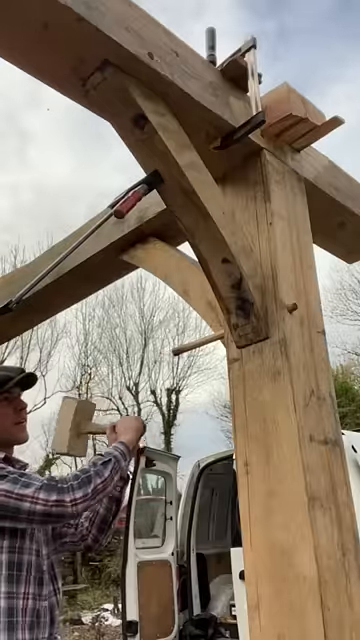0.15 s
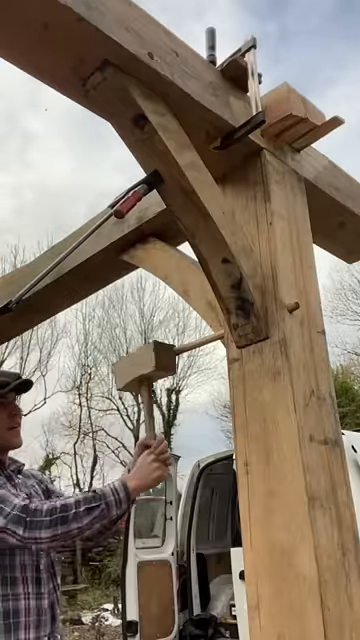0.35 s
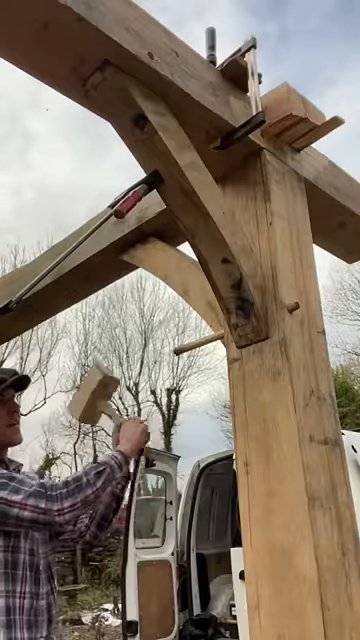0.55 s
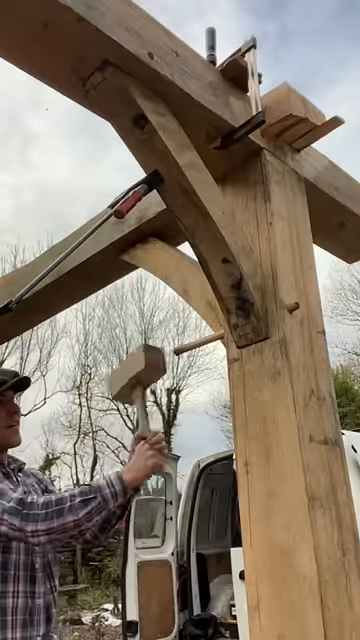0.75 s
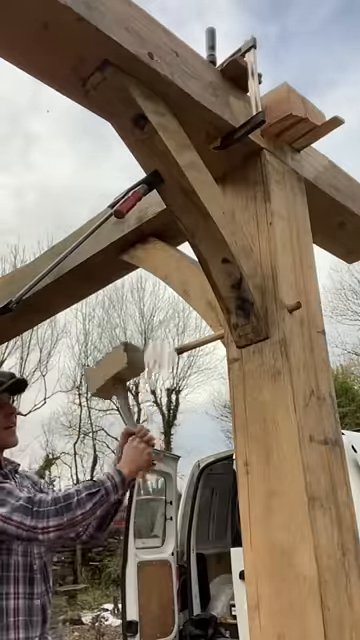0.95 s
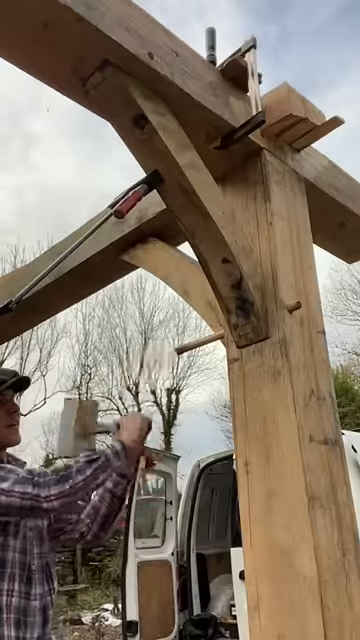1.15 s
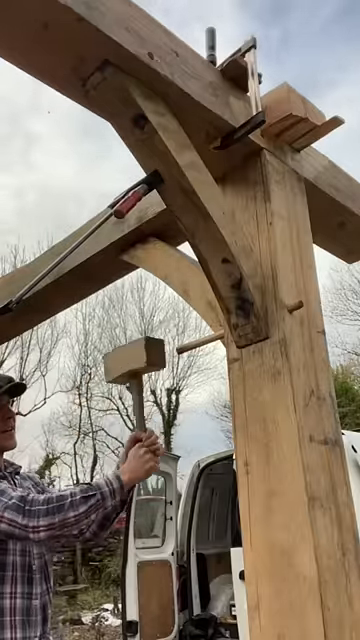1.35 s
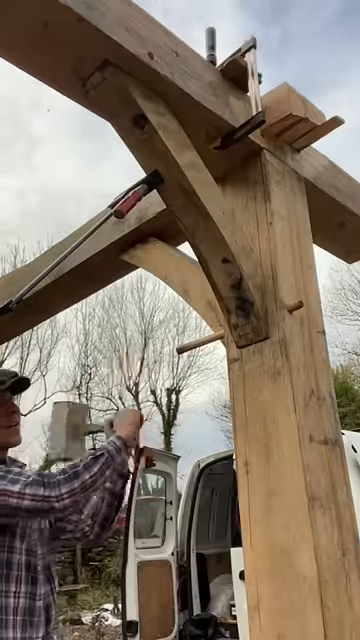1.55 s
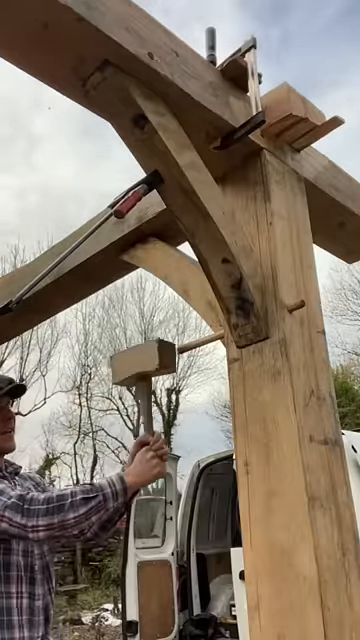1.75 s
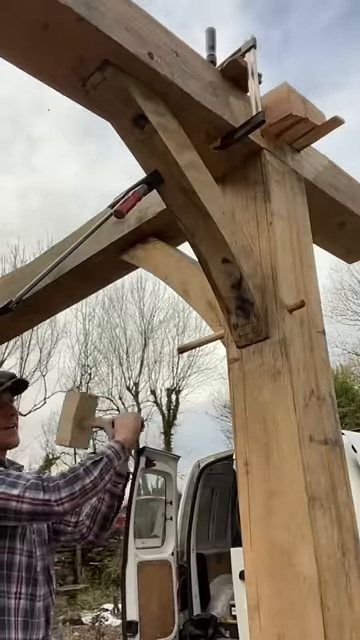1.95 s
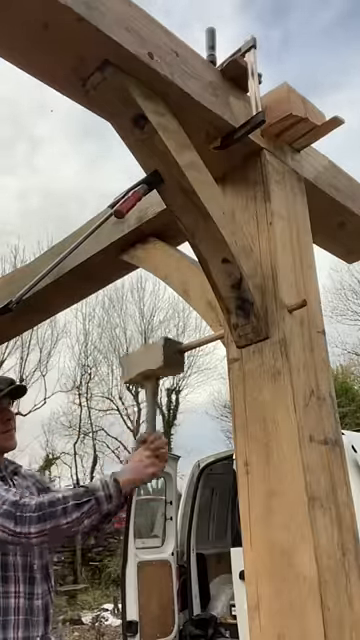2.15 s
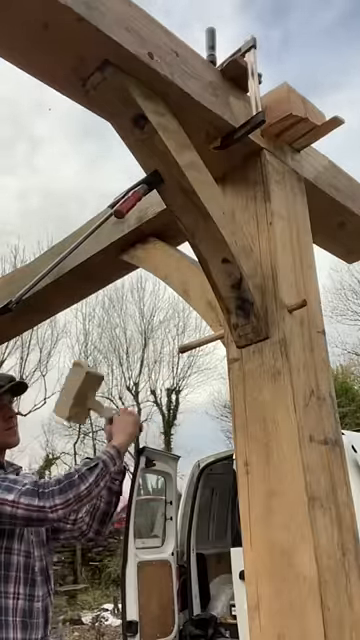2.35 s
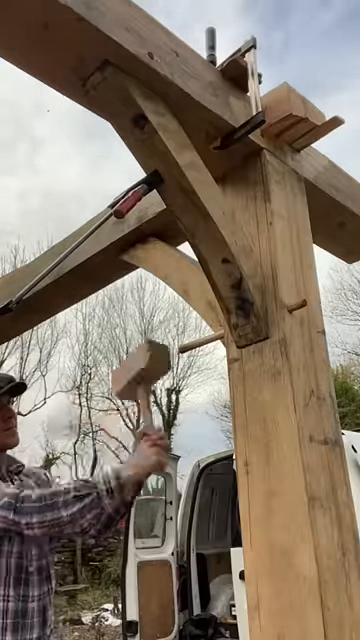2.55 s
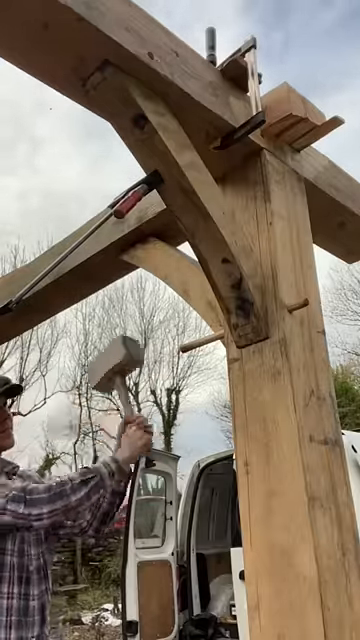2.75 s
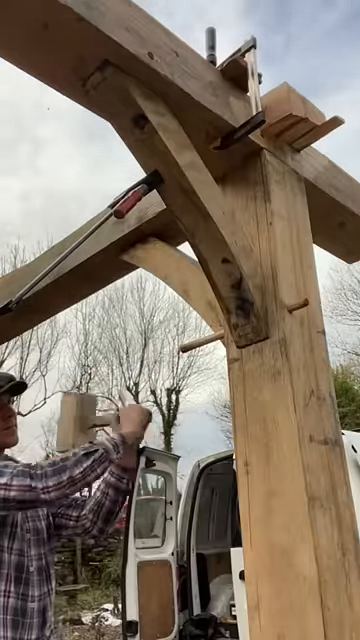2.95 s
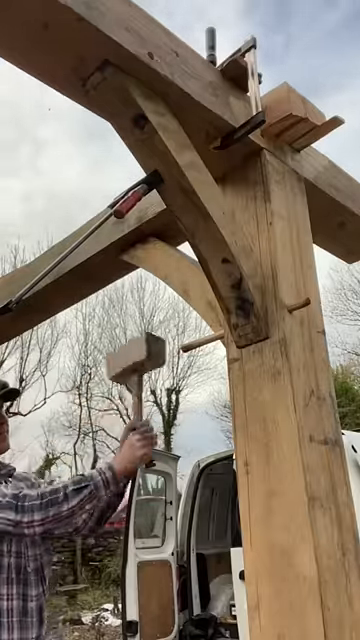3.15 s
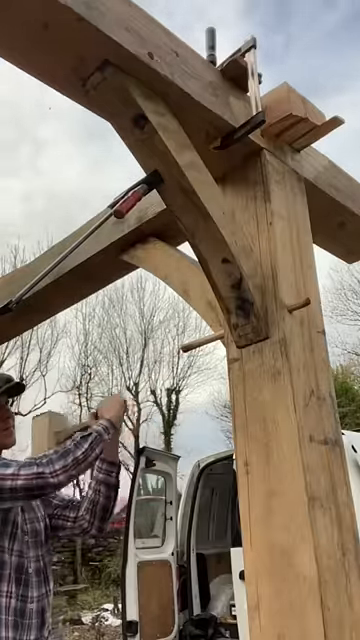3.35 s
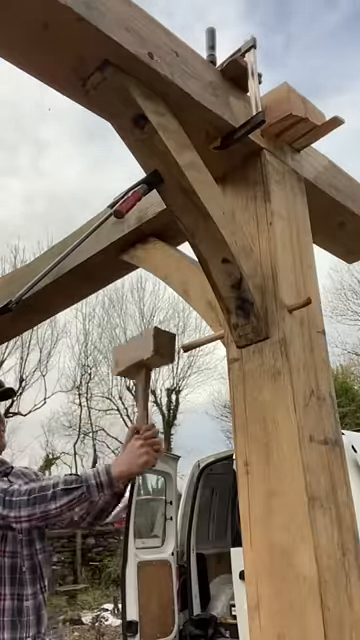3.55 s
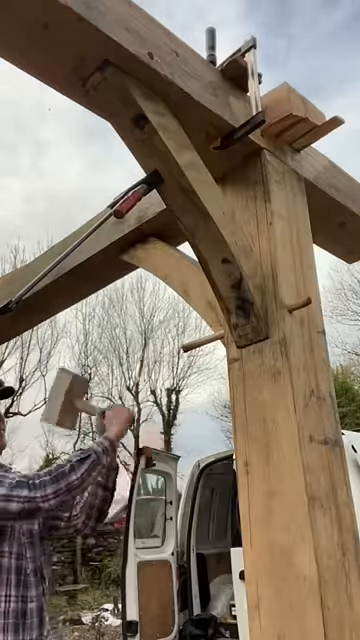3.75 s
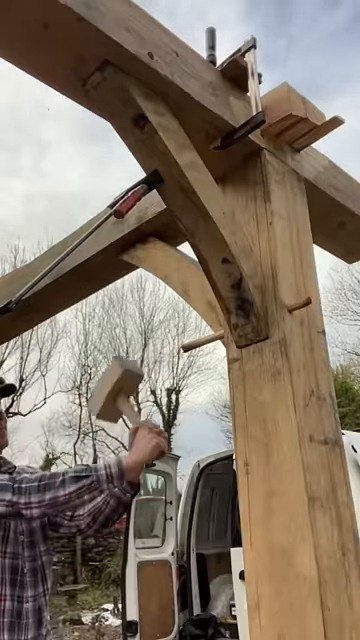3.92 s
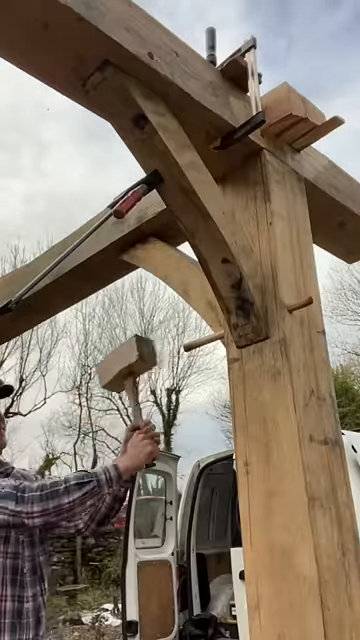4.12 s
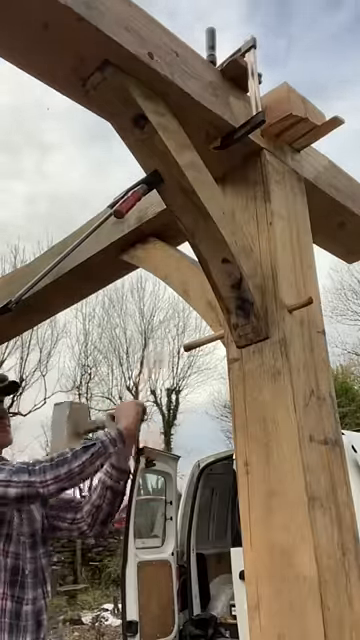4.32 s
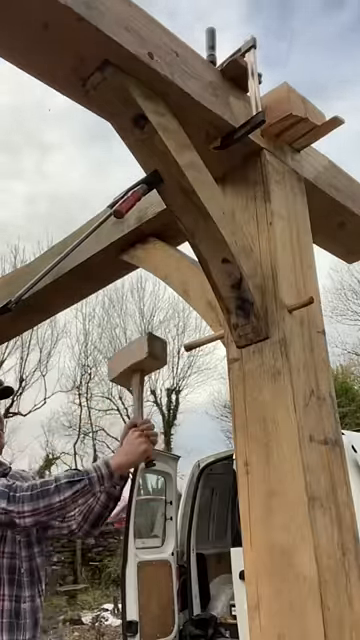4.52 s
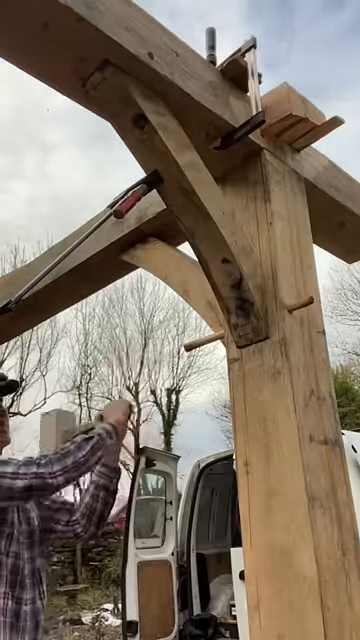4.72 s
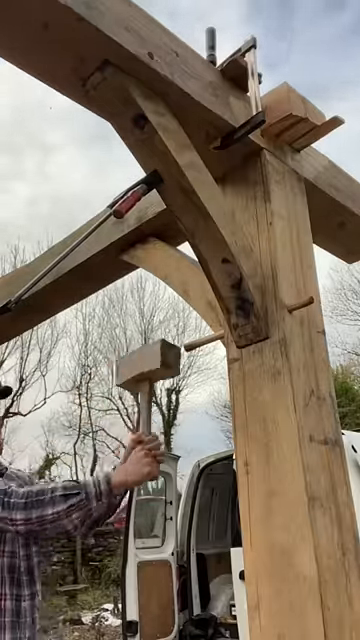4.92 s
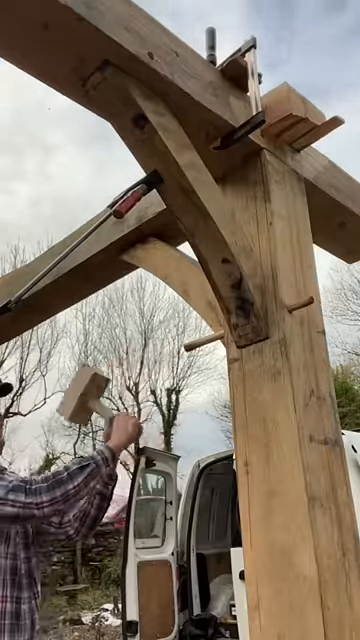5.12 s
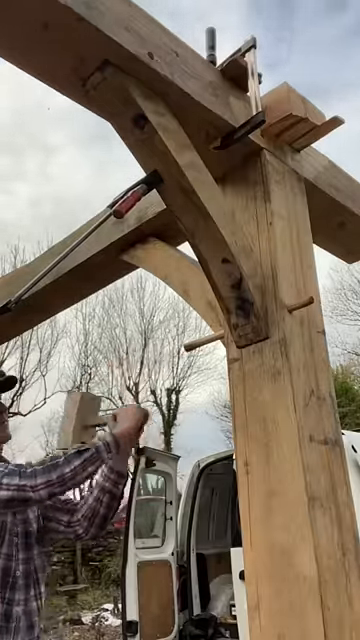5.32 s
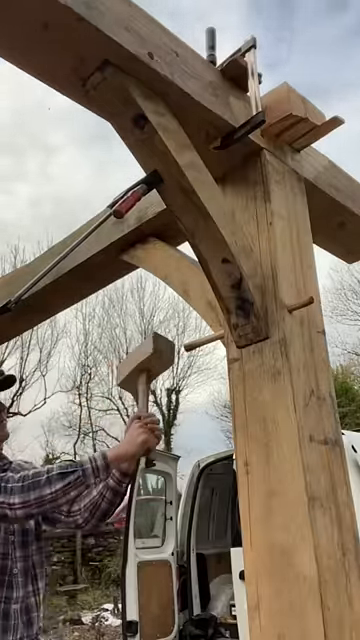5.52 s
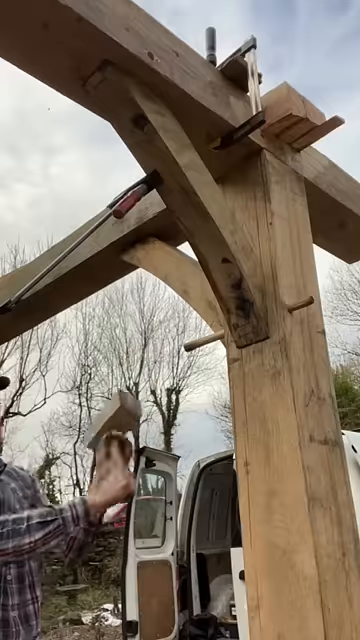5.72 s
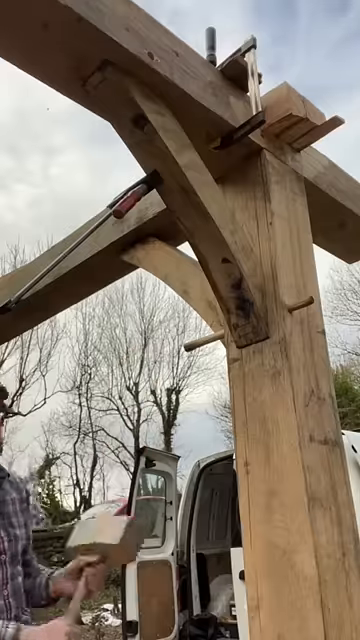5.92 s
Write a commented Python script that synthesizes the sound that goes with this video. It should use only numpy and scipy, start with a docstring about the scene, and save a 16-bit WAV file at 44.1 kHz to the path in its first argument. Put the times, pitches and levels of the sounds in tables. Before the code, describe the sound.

A big wooden mallet drives an oak peg into a timber frame in a quiet yard. Twelve blows land at about two per second, each a sharp woody crack with a thump and a short, clattering echo. A faint low ring rises in pitch as the peg goes in. The last two blows sound deeper and hollow, with a very faint distant bird between them. A sleeve rustles softly at the end.

```python
"""Outdoors, a big wooden mallet drives an oak peg into the joint of a timber frame.
The tail of one blow opens; twelve more follow from 0.4 s, each a short woody crack, then a thump, a
pitched clatter of echoes and the yard's tail. A faint low ring climbs in pitch as the peg goes in.
The last two blows (5.0 s, 5.5 s) land on a tight joint, deep and hollow; between them a far bird
chirps. Last, a sleeve rustles as the arm comes down."""
import sys
import numpy as np
from scipy import signal
from scipy.fft import rfft, irfft, next_fast_len
from scipy.io import wavfile
from scipy.ndimage import uniform_filter1d

SR = 44100
rng = np.random.default_rng(int(sys.argv[2]) if len(sys.argv) > 2 else 0)


def store_wav(level_fs):
    """Save 16-bit WAV to argv[1]."""
    pcm = np.round(np.clip(np.atleast_2d(level_fs), -1, 1) * 32767)
    wavfile.write(sys.argv[1], SR, pcm.T.astype(np.int16))


N = 268118
BLOW_N = SR * 2 // 3  # samples per blow
T = np.arange(BLOW_N) / SR

# Near-echo spectrum: (frequency [Hz], density [dB])
NEAR_SPECTRUM = [(25, -18), (60, -8), (120, -8.5), (160, -12.5), (220, -2.5), (330, -1), (400, -4),
                 (480, -6.5), (750, -1.5), (1200, -9), (1550, 7), (2000, 1), (3000, -7.5), (4300, -10.5),
                 (9000, -14.5), (12000, -27), (15500, -26)]


def amp(db):
    """Decibels to gain."""
    return 10 ** (np.asarray(db) / 20)


def unit(x):
    """x at rms 1."""
    return x / np.sqrt(np.mean(x ** 2) + 1e-20)


def along(points, hz):
    """(frequency [Hz], value) points read on a log axis."""
    point_hz, values = np.transpose(points)
    return np.interp(np.log(hz + 1), np.log(point_hz + 1), values)


def fade(t60_s, t=T):
    """Decay of 60 dB in t60_s."""
    return np.exp(-np.log(1000) * t / t60_s)


def rise(start_s, rise_s):
    """Smooth step from 0 to 1."""
    return 1 - np.exp(-(np.maximum(T - start_s, 0) / rise_s) ** 2)


def swell(centre_s, spread_s, t=T):
    """Gaussian envelope, peak 1."""
    return np.exp(-0.5 * ((t - centre_s) / spread_s) ** 2)


def noise(spectrum, size=BLOW_N):
    """Coloured noise, rms 1."""
    gain = amp(along(spectrum, np.fft.rfftfreq(size, 1 / SR)))
    return unit(irfft(rfft(rng.standard_normal(size)) * gain, size))


def coloured(x, points):
    """Minimum-phase filter through (frequency [Hz], gain [dB]) points."""
    hz = np.fft.rfftfreq(2 * BLOW_N, 1 / SR)
    cepstrum = irfft(np.log(amp(along(points, hz))))
    cepstrum[1:BLOW_N] *= 2
    cepstrum[BLOW_N + 1:] = 0
    return irfft(rfft(x, 2 * BLOW_N) * np.exp(rfft(cepstrum)))[:BLOW_N]


def ring(partials, scatter_db, detune, waver=0, size=BLOW_N):
    """Damped sines; level and pitch vary per call, waver adds pitch jitter."""
    hz, db, t60_s = np.transpose(partials)[:, :, None]
    strength, pitch = rng.standard_normal((2, len(partials), 1))
    hold_n = 384
    steps = rng.standard_normal((len(partials), size // hold_n + 1))
    jitter = np.repeat(steps, hold_n, axis=1)[:, :size]
    phase = 2 * np.pi * np.cumsum(hz * (1 + detune * pitch + waver * jitter), axis=1) / SR
    waves = amp(db + scatter_db * strength) * fade(t60_s, T[:size]) * np.sin(phase)
    return np.pad(waves.sum(axis=0), (0, BLOW_N - size))


def add(track, x, start_s):
    """Mix x into track; start_s may be negative."""
    at = round(start_s * SR)
    lo, hi = max(at, 0), min(at + len(x), len(track))
    track[lo:hi] += x[lo - at:hi - at]


def strike():
    """Wood on wood: contact builds within 1 ms, fibres crack, head and peg ring briefly."""
    # Head and peg modes: (frequency [Hz], level [dB], t60 [s])
    wood_modes = [(569, -27, 0.028), (760, -22, 0.023), (942, -26.5, 0.035), (1665, -14.5, 0.02),
                  (1810, -22, 0.044), (2370, -34, 0.009), (2277, -9.5, 0.014), (2790, -27.5, 0.03),
                  (3350, -21, 0.017), (3760, -25, 0.018), (3950, -23.5, 0.018), (4290, -20, 0.017),
                  (4680, -26, 0.019), (5410, -18.5, 0.014), (5970, -17.5, 0.014), (7930, -24, 0.015),
                  (9380, -24, 0.013), (9370, -17, 0.011), (14800, -18.5, 0.0037)]
    # Fibre crack: (frequency [Hz], density [dB])
    crack_spectrum = [(200, -27), (1200, -9), (2500, 4), (6000, 5), (11000, -2.5), (16000, -2)]
    # The crack has little bass; the low thump arrives just after: (frequency [Hz], gain [dB])
    bass_cut = [(100, -11), (260, -8), (440, 0)]
    crack = amp(-11) * noise(crack_spectrum) * fade(0.008)
    wood = amp(1) * ring(wood_modes, scatter_db=1.8, detune=0.031, size=2048)
    return coloured((wood + crack) * rise(0, 0.0004), bass_cut)


def thump():
    """Slow bending waves run through the frame and arrive after the crack."""
    # Wave packets: (delay [s], spread [s], frequency [Hz], level [dB])
    packets = [(0.011, 0.0027, 309.4, -40.5), (0.02, 0.007, 65.76, -35), (.02, 0.0029, 217.4, -37),
               (.057, 0.0072, 215, -36), (0.102, 0.0057, 79.6, -44.5)]
    waves = np.zeros(BLOW_N)
    for delay_s, spread_s, hz, db in packets:
        envelope = amp(db + rng.normal(0, 0.5)) * swell(delay_s, spread_s)
        waves += envelope * np.cos(2 * np.pi * hz * (T - delay_s))
    return waves


def frame_and_clatter():
    """Low frame ring, plus a pitched 1.5-2.3 kHz clatter of nearby echoes."""
    # Low frame ring, then echo comb lines from 1470 Hz up: (frequency [Hz], level [dB], t60 [s])
    partials = [(52, -44.5, 0.38), (92.8, -48.5, 0.63), (122.1, -44, 0.4), (210, -45, 0.17),
                (312, -38, 0.073), (391.5, -38.5, 0.14), (542.3, -27.5, 0.13), (719, -43.5, 0.34),
                (766, -43.5, 0.26), (914, -37, .11), (1470, -31, 0.041), (1540, -25.5, 0.22),
                (1612, -26.5, 0.082), (1700, -27.5, 0.075), (1830, -29, 0.076), (1776, -29, 0.11),
                (1875, -24, 0.17), (1950, -29.5, 0.22), (2121, -30, 0.13), (2300, -31, 0.08)]
    return ring(partials, scatter_db=0.1, detune=0.0011, waver=0.006) * rise(0.0049, 0.011)


def near_echoes(surfaces):
    """The same nearby surfaces return every blow: strong clusters over dense scatter."""
    # Echoes off beams, ground and a van: (delay [s], spread [s], level [dB])
    echoes = [(0.015, 0.0015, -5.5), (0.0247, 0.00067, -6), (0.0291, 0.0022, -0.5), (0.052, 0.0033, -9)]
    cluster_power = sum(amp(db) ** 2 * swell(delay_s, spread_s) for delay_s, spread_s, db in echoes)
    scatter = amp(-0.5) * fade(0.25) * rise(0.003, 0.0063)
    pattern = unit(surfaces + amp(-13.5) * noise(NEAR_SPECTRUM))
    return amp(-25.5) * pattern * np.sqrt(cluster_power + scatter ** 2)


def yard():
    """Trees and walls farther off return a long tail, with one far wall's soft slap."""
    # Tail colour: (frequency [Hz], density [dB])
    spectrum = [(30, -18.5), (80, 1.5), (155, -1), (240, 3), (420, -6.5), (750, 4.5), (1200, -4.5),
                (1550, 3.5), (1950, 4.5), (2400, -3), (3000, -6.5), (4400, -7), (7500, -9.5), (10000, -21),
                (13000, -35), (16000, -35)]
    # Tail decay: (frequency [Hz], t60 [s])
    decay = [(100, .55), (500, 0.41), (1100, .46), (1850, 0.53), (2700, 0.51), (8000, 0.46), (12000, 0.56),
             (16000, .25)]
    hz, t, bins = signal.stft(noise(spectrum), SR, nperseg=256)
    bins *= fade(along(decay, hz)[:, None], t)
    tail = signal.istft(bins, SR, nperseg=256)[1][:BLOW_N]
    slap = amp(-9.5) * swell(0.15, 0.0127)
    return amp(-34) * tail * (rise(0.016, 0.061) + slap)


def aim_colour(blow, bite_db, bright_db, thump_db):
    """Where head meets peg sets the colour: edge-on contact bites, a square blow lifts the treble."""
    bite = [(2460, 0), (3550, bite_db), (4500, 0)]
    bass = [(30, thump_db - 3.5), (110, thump_db), (190, 0)]
    treble = [(2500, 0), (7000, bright_db)]
    return coloured(coloured(blow, bite), bass + treble)


def joint_colour(blow, peg_hz, tightness, band_weight):
    """A tighter joint sounds more hollow; the peg adds bands that follow its pitch."""
    # Fully tight joint relative to loose: (frequency [Hz], gain [dB])
    hollow = [(70, -4), (140, 4.5), (210, 2), (310, 20), (400, 20.5), (520, 20), (740, 9), (1150, 7.5),
              (1550, -6.5), (2200, -8.5), (3000, -3), (4600, -7), (7000, -9)]
    # Peg bands: (multiple of peg pitch [-], gain at weight 1 [dB])
    bands = [(6, -1), (8.4, 2.5), (10.2, -0.5), (11.2, -2), (12.4, 2), (13.6, 3.5), (15.5, -1), (18, -0.5),
             (24, -2)]
    blow = coloured(blow, [(hz, tightness * db) for hz, db in hollow])
    return coloured(blow, [(multiple * peg_hz, band_weight * db) for multiple, db in bands])


def peg_ring(peg_hz, tightness):
    """The peg's free end rings on, more briefly as the joint grips."""
    t60_s = np.interp(tightness, [0, 1], [0.65, 0.2])
    return np.sin(2 * np.pi * peg_hz * T) * fade(t60_s) * rise(0.01, 0.02)


def mallet():
    """Each blow cracks, thumps, echoes and leaves the peg ringing."""
    # Blows: (time [s], level [dB], bite [dB], brightness [dB], thump [dB], peg ring [dB])
    blows = [(-0.08, -0.5, 0.5, -3.5, 2, -40), (0.3863, -1.5, 4.5, -2.5, -1.5, -44),
             (0.8536, -1.5, -0.5, -2.5, -1.5, -35), (1.3118, -0.5, 2, -1, 1, -48.5),
             (1.7584, 0, 0, -0.4, 1, -46), (2.2013, -0.55, -3, -0.5, 10.5, -40),
             (2.651, -0.5, -1.5, -0.5, 0.5, -43.5), (3.105, 0.5, -1.5, -1, -1, -43),
             (3.5653, 2.07, -2, 0, -2.5, -47.5), (4.0347, 2.46, -1.5, 0.5, -2.5, -48),
             (4.4989, 2.5, -1, 0.5, -2, -52.5), (4.964, 4.5, 5, -2.5, -2, -48),
             (5.5344, 0.5, 4, -3, 0.5, -44.5)]
    # The free end shortens and rings higher, then the joint grips:
    # (time [s], pitch [Hz], tightness [0-1], band weight [-])
    seating = [(-0.08, 195, 0.11, 0.3), (0.85, 209.5, 0.06, 0.2), (1.31, 250.7, 0.07, 0.46),
               (3.1, 307.9, 0.03, 0.52), (3.57, 313, 0.19, 1.3), (4.5, 339, 0.2, 1.2),
               (4.96, 340.5, 0.58, 0.3), (5.53, 339, 0.97, 0.1)]
    seating_s, *columns = np.transpose(seating)
    surfaces, far_walls = noise(NEAR_SPECTRUM), yard()
    track = np.zeros(N)
    for time_s, db, bite_db, bright_db, thump_db, ring_db in blows:
        peg_hz, tightness, band_weight = (np.interp(time_s, seating_s, column) for column in columns)
        # part of the tail repeats; the rest changes as arm and mallet move
        tail = amp(-2) * far_walls + amp(-2.5) * yard()
        # a tight joint answers more weakly and dies sooner
        grip = amp(1.13 - 5 * tightness) * np.exp(-8.4 * tightness * T)
        blow = strike() + thump() + grip * (frame_and_clatter() + near_echoes(surfaces) + tail)
        blow = aim_colour(blow, bite_db, bright_db, thump_db)
        blow = joint_colour(blow, peg_hz, tightness, band_weight)
        blow += amp(ring_db) * peg_ring(peg_hz, tightness)
        add(track, amp(db) * blow, time_s)
    return track


def air():
    """Quiet outdoor air with a distant rumble."""
    # Background: (frequency [Hz], density [dB])
    spectrum = [(20, -35.5), (32, -21), (42, -6), (52, 2), (75, -6), (100, -9.5), (140, -26), (300, -36),
                (800, -34.5), (4000, -40.5), (10000, -54), (16000, -65)]
    return amp(-67) * noise(spectrum, N)


def bird():
    """Faint, far chirps, blurred by the trees."""
    # Chirps: (time [s], pitch [Hz], level [dB])
    chirps = [(5.235, 4085, -78), (5.286, 3800, -77), (5.355, 3950, -78), (5.425, 3980, -84),
              (5.504, 3900, -83)]
    t = np.arange(N) / SR
    blur = unit(uniform_filter1d(rng.standard_normal(N), size=60))
    return blur * sum(amp(db) * swell(time_s, 0.0092, t) * np.sin(2 * np.pi * hz * t)
                      for time_s, hz, db in chirps)


def sleeve():
    """Cloth slides unevenly as the arm is lowered."""
    # Rustle envelope: (time [s], level [dB])
    envelope = [(5.65, -100), (5.78, -89), (5.84, -81), (5.89, -87.5), (5.94, -84), (6.0, -83.5),
                (6.08, -80)]
    # Cloth friction: (frequency [Hz], density [dB])
    spectrum = [(300, -11.5), (1500, 0.5), (4000, -0.5), (9000, -5), (15000, -13)]
    level_db = np.interp(np.arange(N) / SR, *np.transpose(envelope))
    folds_db = 1.5 * unit(uniform_filter1d(rng.standard_normal(N), size=700))
    return amp(level_db + folds_db) * noise(spectrum, N)


def scene():
    """Mono mix of all sources."""
    return (mallet() + air() + bird() + sleeve())[None]


def record(dry):
    """The microphone rounds off the highest peaks and limits the band."""
    ceiling, top_hz = 0.66, 16500
    rounded = dry / (1 + (dry / ceiling) ** 4) ** 0.25
    size = next_fast_len(N + SR)
    lowpass = 1 / (1 + (np.fft.rfftfreq(size, 1 / SR) / top_hz) ** 120)
    return irfft(rfft(rounded, size) * lowpass, size)[:, :N]


dry = scene()
out = record(dry)
store_wav(out)
```